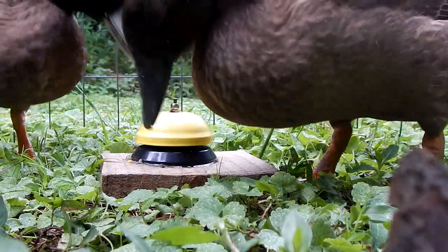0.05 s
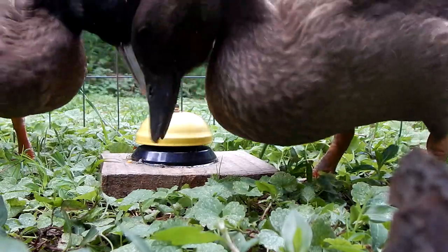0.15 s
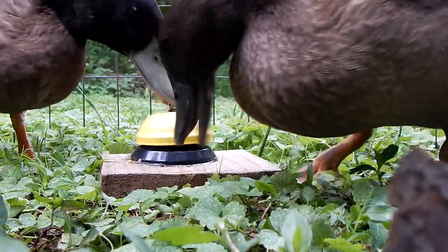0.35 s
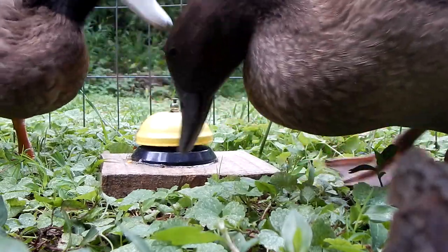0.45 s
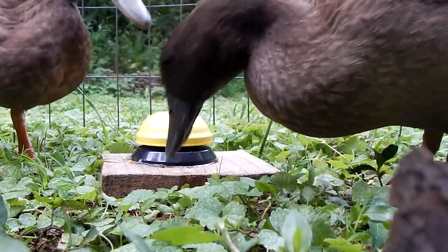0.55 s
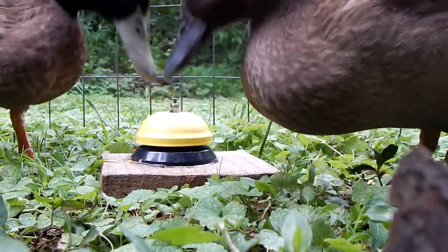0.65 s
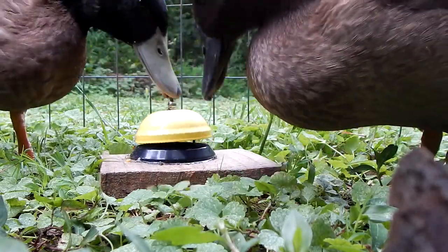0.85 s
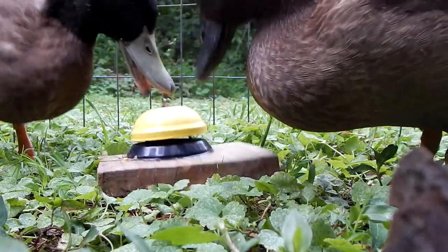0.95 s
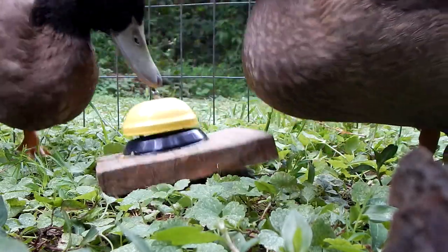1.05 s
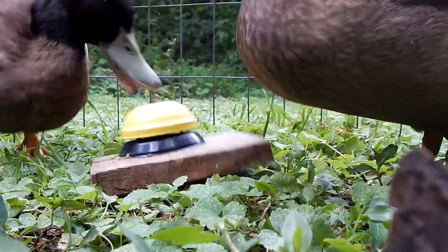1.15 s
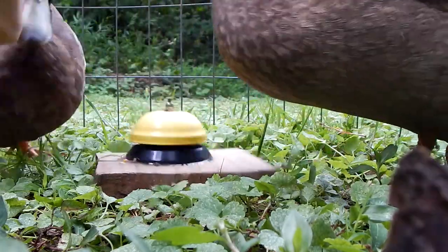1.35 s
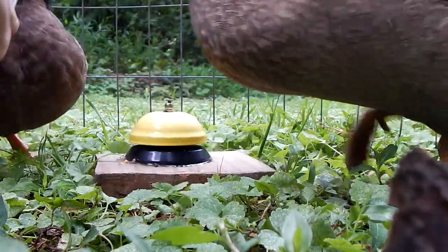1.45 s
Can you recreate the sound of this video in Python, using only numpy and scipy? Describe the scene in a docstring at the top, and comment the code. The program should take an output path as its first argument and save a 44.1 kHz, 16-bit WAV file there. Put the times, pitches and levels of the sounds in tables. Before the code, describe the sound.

A small counter bell rings once amid duck pecks, soft clucks and a thud.

```python
"""Ducks peck at a counter bell on a loose board, close by in a softly rustling garden.
The bell still hums from an earlier blow as bills scrape and tap its shell. Short, soft clucks begin;
one bill scrapes over the plunger and rings the bell, and the clapper buzzes against the shell.
The board tips with a thud and the bell clacks down on it; the ring drops suddenly in level, together
with the background. The shell snaps against its base among a few last faint taps and clucks."""
import sys
import numpy as np
from scipy import signal
from scipy.fft import rfft, irfft
from scipy.io import wavfile
from scipy.ndimage import uniform_filter1d

SR = 44100
rng = np.random.default_rng(int(sys.argv[2]) if len(sys.argv) > 2 else 0)


def master_out(mix):
    """Clip the mix to full scale and print it as 16-bit PCM to the path in sys.argv[1]."""
    frames = np.transpose(np.atleast_2d(mix))
    ceiling = np.clip(frames, -1, 1)
    pcm = np.round(ceiling * 32767).astype(np.int16)
    wavfile.write(sys.argv[1], SR, pcm)


N = 66150
T = np.arange(N) / SR
LEAD_S = .03  # room for a short event to swell before its start
AGE = np.arange(8192) / SR - LEAD_S  # seconds since a short event's start

# stereo spread of all noise: frequency_hz, side_to_mid_ratio
STEREO_WIDTH = [(100, 0.17), (500, 0.5), (2000, 0.58), (10000, 0.7)]
# tone of the outdoor air: frequency_hz, level_db
GARDEN_COLOUR = [(25, -8), (70, 3.5), (140, -7.5), (230, 0), (380, -8.5), (550, -17), (1000, -13.5),
                 (1700, -20), (2500, -21.5), (4000, -24), (6000, -22.5), (9500, -23.5), (12500, -27),
                 (16000, -39)]
# fader ride of the garden bed: time_s, level_db
GARDEN_RIDE = [(0, -54), (.55, -52), (.7, -56.5), (.88, -58.5), (.95, -61), (1.06, -58), (1.11, -70),
               (1.2, -73), (1.5, -70.5)]

# bills dragging over metal: start_s, level_db, rise_s, t60_s, treble_db
BILL_SCRAPES = [(.003, -32, .002, .03, -13.5), (.016, -38, .003, .05, -3),
                (0.726, -38.5, .0003, 0.043, -10), (.734, -37.5, .002, .04, -15),
                (.746, -31.5, .003, 0.039, -19), (0.7543, -22.5, .0015, 0.052, 1.5),
                (0.7671, -21, .0003, .025, 14), (.785, -45.5, .005, .2, 3), (1.044, -35, .0005, .02, -21),
                (1.05, -42, .003, .05, -28.5), (1.062, -34, .002, 0.035, -14),
                (1.307, -56.5, .02, 0.11, -19.5)]
# tone of that friction: frequency_hz, level_db
FRICTION_COLOUR = [(100, -12), (500, -12), (1200, 3.5), (2000, -0.5), (3300, 0), (4800, -6.5), (6000, -8),
                   (9500, -8), (12500, -16), (16000, -31.5)]
# bills pecking the shell: start_s, level_db, t60_s, treble_db, pan_db
BILL_TAPS = [(.2175, -22.5, .03, 7.5, 0.5), (.2275, -27.5, .04, -8.5, 0), (.2365, -33, 0.046, -10, -2),
             (.272, -39, 0.085, -10, -1.5), (.283, -43, 0.081, -21, -2), (.302, -38, 0.033, -12, -1),
             (.312, -41.5, 0.063, -15, -1.5), (.339, -40.5, 0.045, -4, 1), (.359, -43, .04, -2, -7),
             (.3642, -29.5, 0.029, 10, 1), (.383, -42, .03, -18, -3.5), (.413, -37.5, .03, -11, 2),
             (.4175, -23, .025, 10, -1), (.432, -36, .04, -5, -3.5), (.444, -42.5, .03, 4, 2),
             (0.865, -45, 0.046, -10, -1), (.879, -42.5, 0.032, -15, 0), (.891, -45.5, 0.034, -14, -1.5),
             (1.0935, -50.5, .025, 10.5, 0.5), (1.108, -60.5, .03, 11, -1), (1.126, -55.5, .04, 4, -2),
             (1.247, -60, 0.021, 5, -1.5), (1.265, -54, .06, -11, -2), (1.281, -60, .05, -11, -2),
             (1.309, -60.5, .05, -5, -2), (1.394, -56.5, .05, -22, -1.5)]
# tone of a peck's click, also used for leaf ticks: frequency_hz, level_db
CLICK_COLOUR = [(100, -15), (400, -19.5), (950, -7.5), (1350, -5.5), (1700, 0.5), (2050, -18), (2600, -25),
                (3300, -4), (3900, -6.5), (4700, -5.5), (5500, -12), (6300, -6.5), (8200, -2), (10000, -3),
                (12000, -5.5), (13500, -22), (16000, -32)]
# short ring of a peck: pitch_hz, level_db, t60_s
TAP_MODES = [(1368, -11.5, 0.039), (1630, -9.5, 0.037), (3805, -14, 0.041), (9670, -11.5, 0.03),
             (11720, -11.5, 0.021)]

# duck calls: start_s, grunt_db, grunt_length_s, whistle_db, tail_db, top_pitch_hz, throat_hz,
# grunt_brightness_db, pan_db
DUCK_CLUCKS = [(0.6221, -18, 0.012, -31, -30, 835, 830, 5, 1),
               (0.7234, -37, 0.0051, -51, -44.5, 834.4, 1500, 10, 0),
               (0.781, -34, 0.0098, -46, -44.5, 810, 740, -14, -0.5),
               (0.981, -31, 0.0067, -43, -35, 891, 968, 8.5, .5),
               (1.1258, -50.5, 0.0098, -59, -60.5, 1023, 1740, -15, -1),
               (1.273, -53.5, 0.0093, -59.5, -55, 1190, 2020, -28, -1),
               (1.4262, -47.5, 0.0068, -59, -46.5, 1127, 1880, -27, -1.5)]
# pitch arch of a cluck: age_s, share_of_top_pitch
CLUCK_ARCH = [(0, .6), (.012, .85), (.022, 1), (.031, .88), (.037, .6), (.046, .5), (.06, .4)]
# filtering by the duck's throat: frequency_hz, gain_db
THROAT_COLOUR = [(200, 2.5), (900, -2), (1400, 1.5), (2300, -0.5), (2800, -9), (4000, -18.5), (6000, -32.5),
                 (12000, -44)]
# tone of its hoarse breath: frequency_hz, level_db
BREATH_COLOUR = [(200, -13.5), (600, 1.5), (1700, -3.5), (2400, -13), (3500, 5), (8000, -20)]

# modes of the bell's shell, lowest first: pitch_hz
SHELL_HZ = [820, 2244, 4171, 6444, 8298, 8957, 9410, 9954, 11030, 11671, 14600]
# the same modes, each with a beating twin: level_db, t60_s, twin_offset_hz, twin_relative_db, pan_db
SHELL_MODES = [(-47, 7.9, .6, -19.5, 3), (-56.5, 2, 4.3, -16.5, -20.5), (-38.5, 1.02, 4.3, -7, -3.5),
               (-29, .62, 3.4, -22.5, -2), (-32, 0.115, 12, -15.5, -5), (-30, 0.38, 8, -19, 0),
               (-20, 0.19, 6.5, -24.5, 5.5), (-25.5, .19, 7, -15, -4), (-47.5, .2, 10, -10, -6.5),
               (-29.5, 0.17, 8, -15.5, -3.5), (-47.5, .13, 10, -14.5, 0.5)]
# clapper chattering on the shell: start_s, level_db
CLAPPER_HITS = [(0.7989, -33), (.8035, -40.5), (.807, -32), (.813, -27.5), (.8195, -46), (0.824, -40),
                (0.831, -34), (0.839, -38), (0.845, -38), (.854, -45)]
# tone of that chatter: frequency_hz, level_db
CLAPPER_COLOUR = [(300, -25.5), (1500, -14.5), (2500, -21), (3700, -2), (4800, -5), (5800, -21),
                  (7400, -17.5), (8050, 7.5), (8700, -6), (11000, -4), (12800, -16.5), (14000, -37.5)]

# board hitting the ground: start_s, level_db, contact_s
BOARD_THUDS = [(1.059, -19, 0.0027), (1.0654, -7.5, 0.00064)]
# resonances of the board: pitch_hz, level_db, t60_s
BOARD_MODES = [(65, -24.5, .06), (178, -2, 0.018), (258, -8, 0.027), (520, -2.5, 0.0073),
               (1150, -20.5, .02), (1800, -24, .04)]
# bell landing on the board: start_s, level_db, t60_s, treble_db, pan_db
BELL_CLACKS = [(1.0674, -10, .014, 5.5, -2), (1.072, -42, .08, 1, 1.5)]
# tone of that landing: frequency_hz, level_db
LANDING_COLOUR = [(60, -8), (300, -4), (1000, -8.5), (1800, -1.5), (3200, -12.5), (5000, -17),
                  (7200, -23.5), (8200, -5.5), (9600, 1.5), (11000, -13.5), (13000, -25), (16000, -40)]
# shell knocking against its base: start_s, level_db, t60_s, treble_db, pan_db
SHELL_SNAPS = [(1.2209, -15, 0.0083, -3.5, 3.5), (1.2228, -29, 0.017, 3, 3.5)]
# tone of a snap's crack: frequency_hz, level_db
CRACK_COLOUR = [(40, 0), (250, -8), (1000, -15), (2600, -5.5), (4200, -14.5), (6000, -6), (7200, -14),
                (8200, 1), (9700, -4.5), (11000, 4), (13000, -29), (16000, -33)]
# resonances of the bell's base: pitch_hz, level_db, t60_s
BELL_BASE_MODES = [(2730, -18, 0.024), (5100, -18, 0.033), (6160, -9.5, 0.016), (7960, -1.5, 0.014),
                   (9700, -1.5, 0.013), (10300, -29, .012)]


def undb(db):
    """Decibels to gain."""
    return 10 ** (np.asarray(db) / 20)


def pan(x, db):
    """Place a sound by its level difference; positive is to the left."""
    return x * undb(np.array([[db], [-db]]) / 2)


def on_log(points, hz):
    """Read a curve of (frequency_hz, value) points on a log-frequency axis."""
    point_hz, values = np.array(points).T
    return np.interp(np.log(hz + 1e-9), np.log(point_hz), values)


def noise(colour, treble_db=0, size=len(AGE)):
    """Stereo noise of unit level in a given colour, with a 6 kHz shelf, wider towards the treble."""
    hz = np.fft.rfftfreq(size, 1 / SR)
    gain = undb(on_log(colour, hz) + treble_db * hz ** 4 / (hz ** 4 + 6000. ** 4))
    mid, side = rfft(rng.standard_normal((2, size))) * gain
    side = side * on_log(STEREO_WIDTH, hz)
    x = irfft(np.array([mid + side, mid - side]), size)
    return x / x.std()


def wobble(samples):
    """Quick random unevenness of unit spread."""
    x = uniform_filter1d(rng.standard_normal(len(AGE)), samples)
    return x / x.std()


def burst(rise_s, t60_s):
    """Envelope that swells up to the event's start and then dies away."""
    log_gain = np.where(AGE < 0, AGE / max(rise_s, 1e-5), -np.log(1000) * AGE / t60_s)
    return np.exp(np.maximum(log_gain, -60))


def ring(age, hz, t60_s):
    """One struck mode: a decaying sine."""
    age = np.maximum(age, 0)
    return np.sin(2 * np.pi * hz * age) * np.exp(-np.minimum(np.log(1000) * age / t60_s, 60))


def body(modes, detune=0):
    """All modes of a struck object, each randomly off pitch by about the share `detune`."""
    return sum(undb(db) * ring(AGE, hz * (1 + detune * rng.standard_normal()), t60_s)
               for hz, db, t60_s in modes)


def add(out, start_s, x):
    """Mix a short event into a track."""
    at = int(round((start_s - LEAD_S) * SR))
    lo, hi = max(at, 0), min(at + len(AGE), N)
    out[:, lo:hi] += x[..., lo - at:hi - at]


def garden(ticks_per_s=45, tick_decay_s=.0012):
    """A bed of soft outdoor air and tiny leaf ticks; it drops away after the thud."""
    ticks = (rng.random(N) < ticks_per_s / SR) * rng.random(N)
    tick_envelope = signal.lfilter([1], [1, -np.exp(-1 / (tick_decay_s * SR))], ticks)
    leaves = tick_envelope * noise(CLICK_COLOUR, treble_db=9, size=N)
    air = noise(GARDEN_COLOUR, size=N)
    fader = undb(np.interp(T, *np.array(GARDEN_RIDE).T))
    return pan((air + undb(9.5) * leaves) * fader, db=-1)


def bell(strike_s=.7677, drop_s=1.069, drop_fall_s=.01):
    """The lowest mode hums on; once struck, mode pairs beat; at the thud the level drops suddenly."""
    out = np.zeros((2, N))
    struck = T > strike_s
    out[:, ~struck] = undb(-54.5) * ring(T[~struck], SHELL_HZ[0], t60_s=6)
    age = T[struck] - strike_s
    for hz, (db, t60_s, beat_hz, twin_db, pan_db) in zip(SHELL_HZ, SHELL_MODES):
        pair = ring(age, hz, t60_s) + undb(twin_db) * ring(age, hz + beat_hz, t60_s)
        out[:, struck] += pan(undb(db) * pair, pan_db)
    since_drop_s = np.maximum(T - drop_s, 0)
    drop_db = -24 * (1 - np.exp(-since_drop_s / drop_fall_s)) - 18 * since_drop_s  # fast, then slow
    return out * undb(drop_db)


def bill_scrapes():
    """Horn drags over metal in short, grainy swells of noise."""
    out = np.zeros((2, N))
    for start_s, db, rise_s, t60_s, treble_db in BILL_SCRAPES:
        grainy_gain = undb(db + 1.6 * wobble(samples=50))
        add(out, start_s, grainy_gain * burst(rise_s, t60_s) * noise(FRICTION_COLOUR, treble_db))
    return out


def bill_taps():
    """Horn strikes the shell: a sharp click and a short ring, tuned a little differently each peck."""
    out = np.zeros((2, N))
    for start_s, db, t60_s, treble_db, pan_db in BILL_TAPS:
        click = undb(-1.5) * burst(.0002, t60_s) * noise(CLICK_COLOUR, treble_db)
        tap = click + body(TAP_MODES, detune=.045)
        add(out, start_s, pan(undb(db) * tap, pan_db))
    return out


def duck_voice(hz, formant_hz, width, formant_db, slope_db, rough):
    """Twelve harmonics on an unsteady pitch, lifted by one throat resonance, at unit level."""
    unsteady_hz = hz * (1 + rough * wobble(samples=40))
    phase = 2 * np.pi * np.cumsum(unsteady_hz * (AGE > 0)) / SR
    harmonic = np.arange(1, 13)[:, None]
    lift_db = formant_db / (1 + ((harmonic * hz - formant_hz) / (width * formant_hz)) ** 2)
    gain = undb(slope_db * np.log2(harmonic) + lift_db)
    return (gain * np.sin(harmonic * phase)).sum(0) / np.sqrt((gain ** 2).sum(0) / 2)


def clucks(whistle_s=.018, whistle_width_s=.01, tail_s=.0425, tail_width_s=.009, low_cut_hz=184):
    """Each cluck opens with a low grunt, flips up to an arching whistle and falls into a hoarse tail."""
    out = np.zeros((2, N))
    throat = undb(on_log(THROAT_COLOUR, np.fft.rfftfreq(len(AGE), 1 / SR)))
    low_cut = signal.butter(4, low_cut_hz, "high", fs=SR, output="sos")
    for (start_s, grunt_db, grunt_length_s, whistle_db, tail_db,
         top_hz, throat_hz, bright_db, pan_db) in DUCK_CLUCKS:
        low_voice = duck_voice(hz=234.2, formant_hz=820, width=.15, formant_db=23 + bright_db,
                               slope_db=-12, rough=.36)
        arch_hz = top_hz * np.interp(AGE, *np.array(CLUCK_ARCH).T)
        high_voice = duck_voice(arch_hz, throat_hz, width=.32, formant_db=22.5, slope_db=-4, rough=.025)
        breath = noise(BREATH_COLOUR)
        rasp = high_voice * undb(2.5 * wobble(samples=70)) + undb(-9) * breath
        gate = np.clip(AGE / .00097, 0, 1) * np.clip((grunt_length_s - AGE) / .001 + .5, 0, 1)
        grunt = undb(grunt_db) * gate * (low_voice + undb(-11) * breath)
        whistle = undb(whistle_db) * np.exp(-((AGE - whistle_s) / whistle_width_s) ** 2) * high_voice
        tail = undb(tail_db) * np.exp(-((AGE - tail_s) / tail_width_s) ** 2) * rasp
        cluck = signal.sosfilt(low_cut, grunt + whistle + tail)
        add(out, start_s, pan(irfft(rfft(cluck) * throat), pan_db))
    return out


def clapper_buzz():
    """Just after the strike the clapper chatters against the shell in bright bursts."""
    out = np.zeros((2, N))
    for start_s, db in CLAPPER_HITS:
        add(out, start_s, undb(db) * burst(rise_s=.0009, t60_s=.033) * noise(CLAPPER_COLOUR))
    return out


def board_thuds():
    """The board tips onto the soil; the longer the contact, the duller the thud."""
    out = np.zeros((2, N))
    for start_s, db, contact_s in BOARD_THUDS:
        push = np.hanning(max(int(contact_s * SR), 3))
        thud = np.convolve(body(BOARD_MODES), push / push.sum())[:len(AGE)]
        add(out, start_s, pan(undb(db) * thud, db=-5))
    return out


def bell_clacks():
    """The bell lands on the board with a hard, dry clack."""
    out = np.zeros((2, N))
    for start_s, db, t60_s, treble_db, pan_db in BELL_CLACKS:
        clack = burst(.00008, t60_s) * noise(LANDING_COLOUR, treble_db)
        add(out, start_s, pan(undb(db) * clack, pan_db))
    return out


def shell_snaps(right_lag_s=.00012):
    """As the board tilts, the shell cracks against its base, which rings briefly."""
    out = np.zeros((2, N))
    for start_s, db, t60_s, treble_db, pan_db in SHELL_SNAPS:
        crack = burst(.00008, t60_s) * noise(CRACK_COLOUR, treble_db)
        base_ring = undb(-2.5) * body(BELL_BASE_MODES, detune=.0065)
        left, right = pan(undb(db) * (crack + base_ring), pan_db)
        late_right = np.interp(AGE - right_lag_s, AGE, right)
        add(out, start_s, np.array([left, late_right]))
    return out


def scatter(direct):
    """Plants and fence throw back a short, diffuse tail."""
    wash = noise([(100, -14), (1800, 2), (4500, -13), (9000, -4.5), (16000, -25.5)])
    response = (wash * burst(rise_s=.001, t60_s=.13))[:, AGE > 0]
    response /= np.sqrt((response ** 2).sum() / 2)
    return signal.fftconvolve(direct, response, axes=1)[:, :N]


def scene():
    """Bell, ducks and board up close, with faint scatter, over the garden bed."""
    direct = bell() + bill_scrapes() + bill_taps() + clucks() + clapper_buzz()
    direct += board_thuds() + bell_clacks() + shell_snaps()
    return direct + undb(-29) * scatter(direct) + garden()


def record(dry, low_cut_hz=61, ceiling=.7, high_cut_hz=16500):
    """The right channel lags by one sample; deep bass is cut, peaks are rounded and the top is cut."""
    mix = np.array([dry[0], np.append(0, dry[1, :-1])])
    mix = signal.sosfilt(signal.butter(2, low_cut_hz, "high", fs=SR, output="sos"), mix)
    mix = ceiling * np.tanh(mix / ceiling)
    return signal.sosfilt(signal.ellip(8, .2, 70, high_cut_hz, fs=SR, output="sos"), mix)


dry = scene()
out = record(dry)
master_out(out)
```